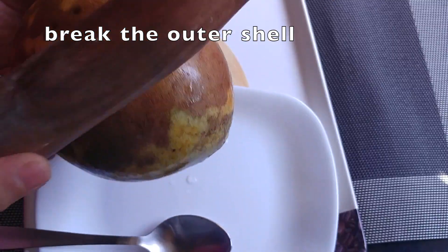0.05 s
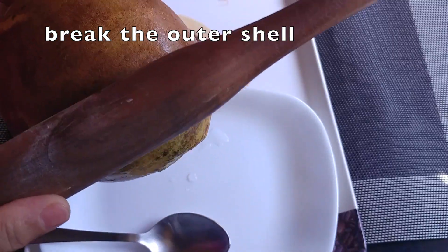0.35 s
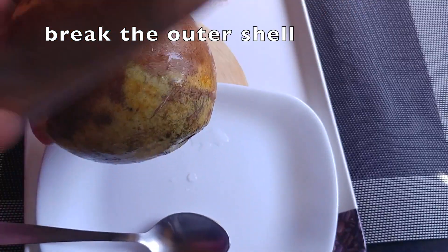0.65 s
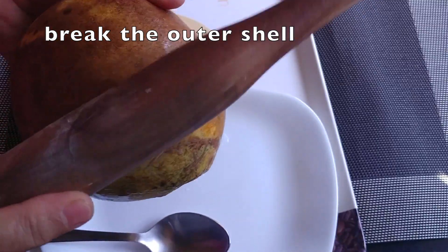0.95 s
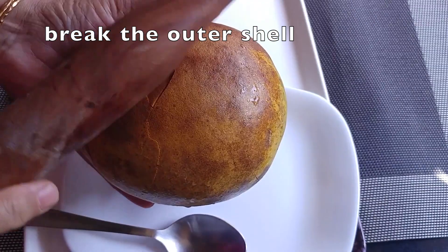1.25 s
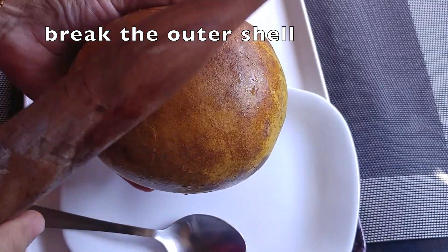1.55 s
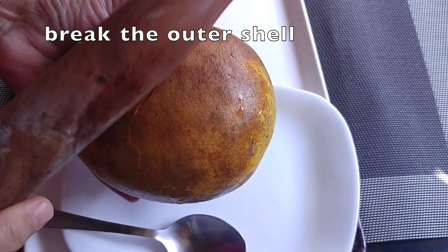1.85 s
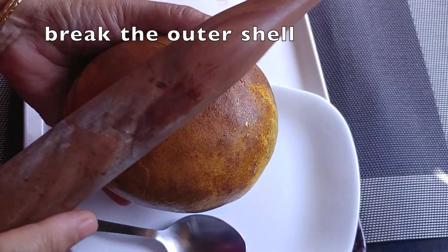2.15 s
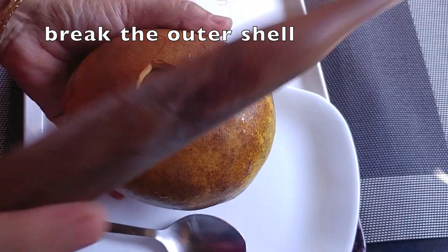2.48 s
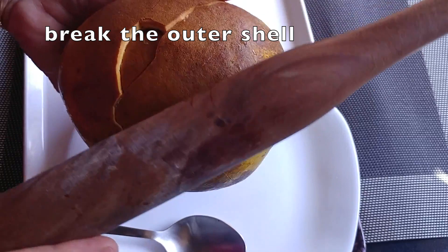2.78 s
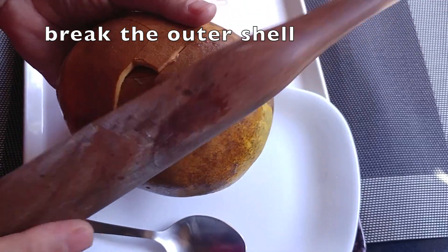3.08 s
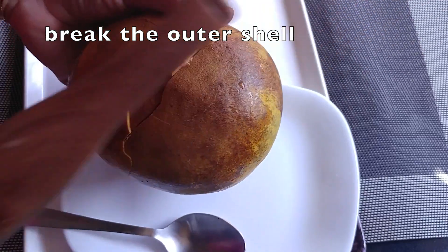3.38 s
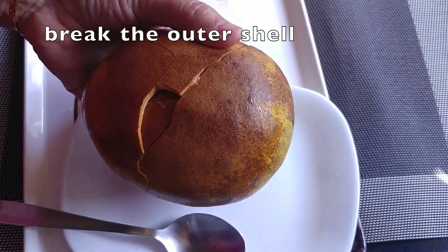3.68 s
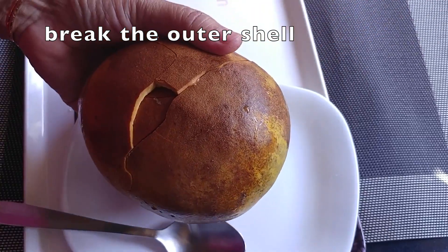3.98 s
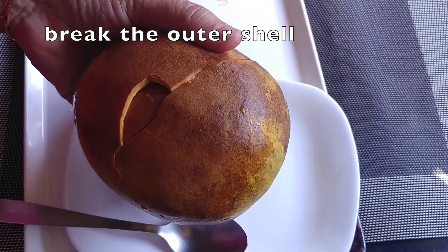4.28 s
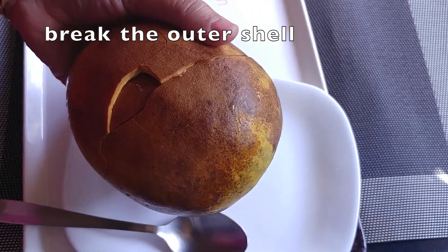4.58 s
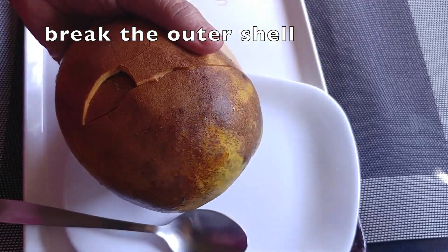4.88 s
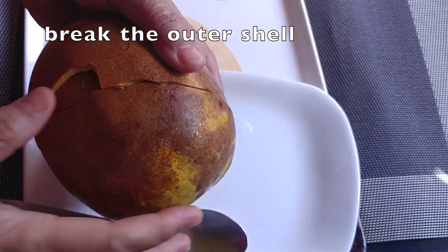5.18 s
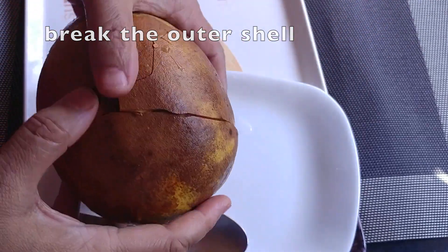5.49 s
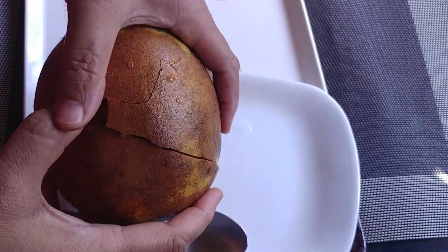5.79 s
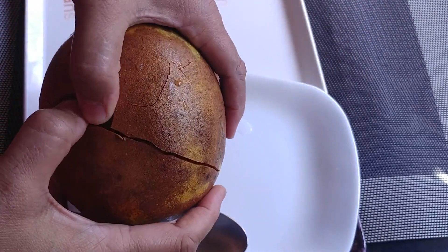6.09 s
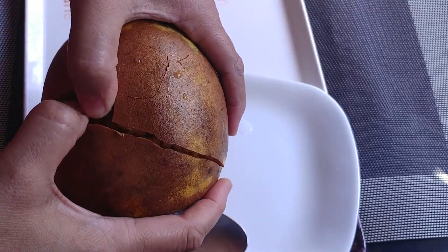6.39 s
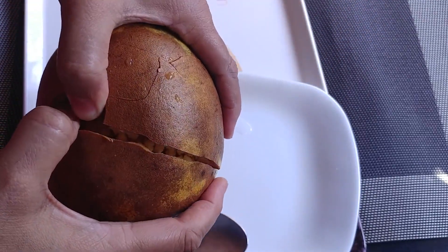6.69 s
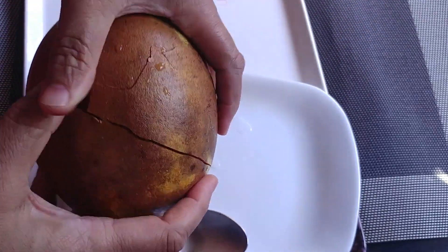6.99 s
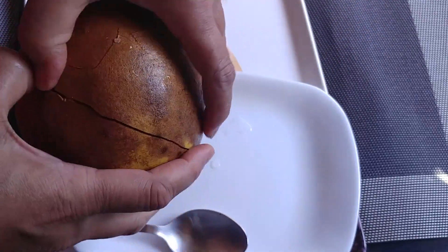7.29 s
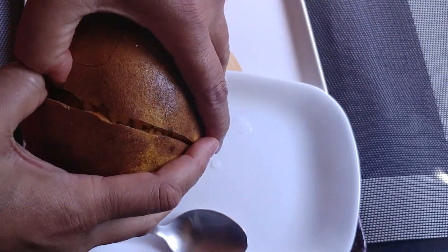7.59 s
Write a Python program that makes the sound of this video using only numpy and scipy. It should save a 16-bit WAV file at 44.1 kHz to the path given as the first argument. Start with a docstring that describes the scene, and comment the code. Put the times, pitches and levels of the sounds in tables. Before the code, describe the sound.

Sharp wooden knocks land on a hard fruit shell, each jolting a china plate and a steel spoon close by. The blows grow heavier and uneven until the shell cracks with a bright clatter. Once they stop, a distant bird whistles a run of chirps outdoors while the fruit turns over on the clinking plate and fingers brush its dry skin. The room is small, with a short echo and a faint hum.

```python
"""A wooden handle knocks on a hard-shelled fruit held on a china plate, close to the microphone.
The heavy blows crack the shell, shake the table and set the plate and a steel spoon chattering;
hands rub the shell, then the fruit rolls over and the plate clinks. The room is small, with a short
echo, a low rumble and a faint hum. Well off microphone, outside, a bird whistles a run of chirps,
and a thin rasp comes from farther away."""
import sys
import numpy as np
from scipy import signal
from scipy.fft import rfft, irfft, next_fast_len
from scipy.io import wavfile

SR = 44100
rng = np.random.default_rng(int(sys.argv[2]) if len(sys.argv) > 2 else 0)


def to_wav(s):
    """Save 16-bit WAV."""
    ch = np.atleast_2d(s).T  # columns
    pcm = np.round(np.clip(ch, -1, 1) * 32767)  # PCM
    wavfile.write(sys.argv[1], SR, pcm.astype(np.int16))


N = 337365

# Levels in the tables are relative, within each source.
# blows on the shell: (time [s], thud [dB], contact hardness as a cutoff [Hz], crack [dB])
SHELL_BLOWS = [(0.2601, -32, 1800, -28), (0.757, -37, 2990, -29), (1.2418, -34.5, 3040, -24.5),
               (1.333, -23, 755, -23), (1.5428, -21.5, 1940, -38), (1.7712, -22, 510, -36),
               (1.8046, -33, 514, -52), (2.5782, -38, 1200, -18.5), (2.5874, -26.5, 400, -30.5),
               (2.616, -25.5, 1635, -19), (2.6290, -25.5, 2000, -17.5), (2.9746, -31.5, 1190, -32),
               (3.1796, -23.5, 2790, -19.5), (4.478, -37, 1098, -42)]
# the fruit bouncing: (time [s], thud [dB], contact hardness [Hz], crack [dB], first gap [s],
# each gap over the last [ratio], step per bounce [dB])
FRUIT_BOUNCES = [(0.3223, -39, 1500, -38.5, 0.033, 0.48, -8), (0.7842, -31.5, 1600, -25, .0178, 0.66, 1.5),
                 (4.758, -37, 500, -35.5, .024, .8, 0.5)]
# modes of the shell, damped by its pulp: (frequency [Hz], level [dB], t60 [s])
SHELL_MODES = [(228, -12, 0.044), (344, -5.5, 0.032), (525, -3, .03), (730, -5.5, 0.0098), (1074, 6, .008),
               (1600, -2, 0.016)]
# the shell's crack as heard, dull above about 10 kHz: (frequency [Hz], level [dB])
CRACK_COLOUR = [(100, -12), (400, 0.5), (9000, -0.5), (10800, -16), (16000, -10)]
# the plate jolted against its tray:
# (time [s], level [dB], chatter length [s], strongest frequency [Hz], spread [octaves], clack [dB])
PLATE_RATTLES = [(0.259, -56, 0.0024, 1300, 1.4, -7), (0.766, -43.5, 0.073, 1990, 0.62, 6),
                 (1.237, -50, 0.048, 1604, 1.5, -13), (1.331, -54, 0.0053, 2670, 0.076, -5),
                 (1.542, -51, 0.0011, 1400, 0.76, 3), (2.601, -36, 0.087, 2360, 0.69, 5),
                 (3.18, -44.5, .0015, 2160, 1.03, -1.5), (4.478, -41, 0.0032, 2970, 0.88, -4.5),
                 (4.485, -38.5, .0012, 2930, 0.094, -10), (4.694, -56, 0.009, 1300, 0.37, -6),
                 (4.759, -32.5, 0.016, 3800, 1.3, -7), (4.774, -35.5, 0.024, 1213, 1.2, -10),
                 (4.8003, -34.5, 0.0051, 3100, 1.15, -3.5), (4.8367, -41, 0.0067, 3000, 0.54, -4.5),
                 (4.854, -43.5, 0.01, 1100, 1.15, -2.5)]
# the spoon bouncing on the china:
# (time [s], level [dB], chatter length [s], strongest frequency [Hz], spread [octaves], clack [dB])
SPOON_RATTLES = [(0.065, -48.5, 0.026, 6400, 1.14, 17), (0.133, -47, .022, 7500, 1.44, 5.5),
                 (0.756, -40.5, 0.045, 8860, 0.48, 8), (0.773, -41, 0.069, 7000, .6, 8),
                 (1.244, -41, 0.042, 9280, 0.82, 16), (2.584, -37, 0.033, 6000, 1.8, 8.5),
                 (2.5983, -27.5, 0.058, 7500, 1.22, -3.5), (2.651, -35.5, .02, 8400, 0.87, 4.5),
                 (2.673, -28, 0.033, 7000, .8, -0.5), (2.700, -33, 0.0219, 4057, 0.51, -5),
                 (3.182, -56.5, .004, 8430, 0.61, 52), (3.413, -62, 0.018, 5170, 2.4, 7.5),
                 (4.272, -46, .014, 4804, 1.05, -0.5)]
# modes of the china plate: (frequency [Hz], level [dB], t60 when loose [s])
PLATE_MODES = [(355, -7, .3), (971, 0, .28), (1034, -7, .2), (1160, -12, .25), (1797, -4, .3),
               (1840, -5, .26), (2503, -13, .16), (2755, -1, .26), (2895, -4, .18), (2945, -1, .2),
               (2990, -7, .22), (3715, -11, .2), (3886, -9, .2), (4330, -9, .2), (4499, 0, .3),
               (4710, -10, .24), (4889, -7, .24), (4942, -6, .22), (6364, -10, .2), (8150, -8, .17),
               (8470, -8, .17)]
# modes of the steel spoon: (frequency [Hz], level [dB], t60 when loose [s])
SPOON_MODES = [(1151, 1, .26), (1833, -4, .2), (3040, 2, .17), (3190, -6, .2), (4063, -1, .28),
               (4447, -7, .25), (4825, -8, .22), (5247, -8, .24), (5303, -4, .24), (5430, -6, .2),
               (5985, -2, .11), (6655, -9, .24), (6711, -9, .24), (7570, -4, .15), (8303, -3, .22),
               (8400, -4, .22), (8686, -4, .22), (9260, -7, .22), (9390, -5, .18), (10060, -9, .16),
               (12614, -10, .2), (13230, -14, .18), (15200, -11, .15)]
# the dense, short-lived ring of a contact on the plate: (frequency [Hz], level [dB])
PLATE_CLACK_COLOUR = [(100, -7), (300, 7.5), (600, 3.5), (1000, 3.5), (1400, -5), (2300, -3.5),
                      (3000, -3.5), (4600, -2), (5600, -6.5), (8400, -12), (9600, -21.5), (11000, -50),
                      (16000, -47.5)]
# the same on the spoon: (frequency [Hz], level [dB])
SPOON_CLACK_COLOUR = [(100, -8.5), (400, -4), (1000, 11), (2300, -1.5), (3000, 2), (5500, 1), (7100, -7),
                      (8500, 6.5), (9800, -11.5), (10800, -22), (12500, -7), (16000, -11.5)]
# the fruit grinding over the china: (frequency [Hz], level [dB])
GRIND_COLOUR = [(60, -0.5), (300, 3), (600, -13.5), (1500, -27.5), (9000, -31.5), (11000, -50),
                (16000, -51)]
# strokes of the hands over the shell: (time [s], length [s], level [dB])
HAND_STROKES = [(0, 0.15, -68.5), (1.3, 0.55, -74), (2.046, 0.081, -70), (2.246, 1, -77.5),
                (3.749, .55, -76), (4.397, 1.33, -83.5), (6.608, 0.09, -81.5), (7.451, 0.21, -86.5)]
# skin sliding on dry shell: (frequency [Hz], level [dB])
SKIN_COLOUR = [(100, -29), (500, -7), (900, -4), (1600, 1.5), (2100, 0), (2900, -14), (5000, -18.5),
               (16000, -39)]
# a thin, high rasp far outside, like a second bird: (time [s], level [dB], frequency [Hz])
FAR_RASPS = [(1.391, -69.5, 5110), (4.05, -78.5, 5450), (5.609, -79, 5600), (7.1, -91, 5020)]
# decay of the small room's echo: (frequency [Hz], t60 [s])
ROOM_DECAY = [(100, .4), (400, 0.38), (1000, 0.3), (3000, 0.29), (8000, 0.29), (16000, 0.27)]
# room tone: (frequency [Hz], level [dB])
AIR_COLOUR = [(20, 0), (48, -1.5), (75, -11), (105, -9), (165, -23), (290, -23.5), (500, -31), (1650, -48),
              (1950, -42.5), (2350, -50.5), (6000, -56.5), (9000, -54.5), (11000, -76), (16000, -71.5)]
# how alike left and right are at the microphone: (frequency [Hz], correlation [ratio])
STEREO_LIKENESS = [(30, 0.99), (150, .96), (300, 0.96), (700, 0.16), (2000, 0.057), (16000, 0.033)]

CRACK_HZ, CRACK_REF_DB, CRACK_DB_PER_OCTAVE = 4183, -28.5, 45  # a stronger crack is brighter
FREE_CHATTER_S, GRIP_POWER = .085, 0.39  # a dish that chatters this long rings fully; a held one less
RING_STOP_S = 1.267  # the ringing stops short here and the room tone steps up
# the song: chirps come quickest, and are loudest, part way through
SONG_S, CHIRP_PERIOD_S, QUICKEST_S, SLOWING_PER_S = 3.52, .293, 4.11, .018
CHIRP_GAIN_DB, LOUDEST_S, FADE_DB_PER_S2 = -63, 4.53, 2.2
# the shape of a typical chirp
CHIRP_S, FLICK_S, ARCH_AT_S, ARCH_S, DROP_AT_S, DROP_S = 0.14, .007, .07, .024, .116, .022
FLICK_HZ, HELD_HZ, TOP_HZ, DROP_HZ = 1995, 3800, 4865, 2600


def knock(thud_db, contact_hz, crack_db, crack_s=0.00028, crumble_db=-18, crumble_s=0.0054):
    """Close up, the shell snaps, then the fruit swings; a soft contact reaches only its low modes."""
    t = clock(.1)
    late = np.maximum(t - .0003, 0)
    swing = sum(amp(db - 60 * late / t60) * np.sin(2 * np.pi * hz * late) for hz, db, t60 in SHELL_MODES)
    bass_cut = signal.butter(2, 150, "high", fs=SR, output="sos")  # a small body radiates little bass
    thud = lowpass(signal.sosfilt(bass_cut, swing), contact_hz)
    snap = np.exp(-t / crack_s) + amp(crumble_db) * np.exp(-t / crumble_s)
    crack_hz = CRACK_HZ * 2 ** ((crack_db - CRACK_REF_DB) / CRACK_DB_PER_OCTAVE)
    crack = lowpass(noise(len(t), CRACK_COLOUR) * snap, crack_hz)
    return 3 * (amp(thud_db) * unit(thud) + amp(crack_db) * unit(crack))


def shell_contacts(bounces=3):
    """Every contact of the shell: the blows, and bounces that come ever faster."""
    yield from SHELL_BLOWS
    for s, thud_db, contact_hz, crack_db, gap, shrink, step_db in FRUIT_BOUNCES:
        for k in range(bounces):
            yield s, thud_db + k * step_db, contact_hz, crack_db + k * step_db
            s += gap * shrink ** k


def chatter(modes, colour, jolt, clack_s, first_force, bounces_per_s, top_hz):
    """A first contact and quick bounces ring the plate or spoon; a grip on it shortens the ring."""
    db, length, centre_hz, spread, clack_db = jolt
    ring_share = min((length / FREE_CHATTER_S) ** GRIP_POWER, 1)
    t = clock(.5)
    chance, size = rng.random((2, len(t)))
    settling = np.exp(-np.minimum(t / length, 10) ** 4)
    force = (chance < bounces_per_s / SR) * (2 * size - 1) * settling
    force[0] = first_force

    def drive(hz):
        """How strongly this contact drives each frequency."""
        return 1 / (1 + .5 * (np.log2((hz + 1) / centre_hz) / spread) ** 2)

    ring = np.zeros((2, len(t)))
    for (hz, mode_db, t60), phase in zip(modes, rng.random((len(modes), 2, 1))):
        pole = np.exp((2j * np.pi * hz - np.log(1000) / (t60 * ring_share)) / SR)
        swing = signal.lfilter([1], [1, -pole], force) * np.exp(2j * np.pi * phase)
        ring += amp(mode_db) * drive(hz) * unit(swing.real)
    clack = signal.fftconvolve(force[None], noise(len(t), colour) * np.exp(-t / clack_s), axes=1)
    padded = 2 * len(t)
    clack = irfft(rfft(clack, padded) * drive(np.fft.rfftfreq(padded, 1 / SR)))[:, :len(t)]
    treble_cut = signal.butter(8, top_hz, fs=SR, output="sos")  # the clink falls steeply above top_hz
    return 40 * amp(db) * unit(signal.sosfilt(treble_cut, unit(ring) + amp(clack_db) * unit(clack)))


def table_top(start, end):
    """Shell, plate and spoon struck near the microphone between two times, with their echo."""
    shell, dishes = np.zeros((2, 2, N))
    for s, thud_db, contact_hz, crack_db in shell_contacts():
        if start <= s < end:
            blow = np.pad(knock(thud_db, contact_hz, crack_db), ((0, 0), (0, SR // 2)))
            add(shell, s, room(blow, near_db=-4.5, walls_db=-8.0))  # each new spot has its own echo
    for s, *jolt in PLATE_RATTLES:
        if start <= s < end:
            add(dishes, s, chatter(PLATE_MODES, PLATE_CLACK_COLOUR, jolt,
                                   clack_s=0.015, first_force=2.5, bounces_per_s=600, top_hz=8620))
    for s, *jolt in SPOON_RATTLES:
        if start <= s < end:
            add(dishes, s, chatter(SPOON_MODES, SPOON_CLACK_COLOUR, jolt,
                                   clack_s=.009, first_force=2.3, bounces_per_s=1100, top_hz=14900))
    return shell + room(dishes, near_db=-12.5, walls_db=-6.5)


def roll(start_s=4.78, db=-59):
    """The rough shell rolls over the china with a dull grinding that dies away."""
    level = amp(db) * envelope(start_s, length=0, attack_s=.03, release_s=0.43)
    return level * noise(next_fast_len(N, real=True), GRIND_COLOUR)[:, :N]


def hands(grain_db=2.5, grains_per_s=70):
    """Close by, skin slides over the dry shell in small, uneven slips."""
    t = np.arange(N) / SR
    slips = np.interp(t * grains_per_s, np.arange(2000), rng.standard_normal(2000))
    strokes = sum(amp(db) * envelope(s, length, attack_s=0.034, release_s=.07)
                  for s, length, db in HAND_STROKES)
    return strokes * amp(grain_db * slips) * noise(next_fast_len(N, real=True), SKIN_COLOUR)[:, :N]


def table_shake(gain_db=23, decay_s=0.17):
    """The level of the table's rumble: each thud shakes it, and the shaking dies away."""
    energy = np.zeros(N)
    for s, thud_db, *_ in shell_contacts():
        energy[round(s * SR)] += amp(gain_db + thud_db) ** 2
    return np.sqrt(signal.lfilter([1], [1, -np.exp(-2 / (decay_s * SR))], energy))


def room(x, near_db, walls_db, near_s=0.0087):
    """The table's reflections reach the microphone within milliseconds, the walls' after them."""
    t = clock(1)
    near = unit(noise(SR) * (t > .003) * np.exp(-t / near_s))
    walls = unit(echo_tail(ROOM_DECAY) * np.clip(t / 0.007 - .5, 0, 1))
    response = amp(near_db) * near + amp(walls_db) * walls
    return x + signal.fftconvolve(x, response, axes=1)[:, :x.shape[1]]


def echo_tail(t60s):
    """A diffuse echo in which each band dies at its own speed."""
    hz, t, bands = signal.stft(noise(SR), SR, nperseg=256)
    decay = amp(-60 * t / curve_at(t60s, hz)[:, None])
    return signal.istft(bands * decay, SR, nperseg=256)[1][:, :SR]


def chirp(waver=.022, rise_s=.02, fade_s=.035, pace_spread=.04, top_db=-3):
    """One whistle: a flick up to a held note, a softer arch above it and a drop, never twice alike."""
    t = clock(CHIRP_S) * (1 + pace_spread * rng.standard_normal())
    flick = np.exp(-t / FLICK_S)
    arch = np.exp(-((t - ARCH_AT_S) / ARCH_S) ** 2)
    drop = (1 + np.tanh((t - DROP_AT_S) / DROP_S)) / 2
    hz = HELD_HZ + (FLICK_HZ - HELD_HZ) * flick + (TOP_HZ - HELD_HZ) * arch + (DROP_HZ - HELD_HZ) * drop
    wobble = np.interp(t, np.linspace(0, CHIRP_S, 40), rng.standard_normal(40))
    level = np.clip(np.minimum(t / rise_s, (t[-1] - t) / fade_s), 0, 1) * amp(top_db * arch)
    return level * np.sin(2 * np.pi * np.cumsum(hz * (1 + waver * wobble)) / SR)


def birds(direct_db=-10, rasp_s=0.15, rasp_width_hz=750, chirps=9):
    """Distant chirps that swell, slow and fade, and a few rasps, arriving mostly as echo off the yard."""
    s, song = SONG_S, np.zeros((2, N))
    for _ in range(chirps):
        add(song, s, amp(CHIRP_GAIN_DB - FADE_DB_PER_S2 * (s - LOUDEST_S) ** 2) * chirp())
        s += CHIRP_PERIOD_S + SLOWING_PER_S * (s - QUICKEST_S) ** 2
    t = clock(rasp_s)
    for s, db, hz in FAR_RASPS:
        flutter = lowpass(lowpass(rng.standard_normal(len(t)), rasp_width_hz), rasp_width_hz)
        add(song, s, amp(db) * flutter / flutter.std() * np.hanning(len(t)) * np.sin(2 * np.pi * hz * t))
    yard = unit(echo_tail([(2000, 0.53), (5000, 0.53)]))
    return amp(direct_db) * song + 1.89 * signal.fftconvolve(song, yard, axes=1)[:, :N]


def room_tone(air_gain_db=-55, split_hz=140, rumble_db=-1.5, hum_hz=92.9, hum_db=-70.5):
    """The room behind it all: rumble that swells as blows shake the table, thin hiss and a low hum."""
    t = np.arange(N) / SR
    early = t < RING_STOP_S  # rumble and hiss start out quieter
    size = next_fast_len(N, real=True)
    air = amp(air_gain_db) * noise(size, AIR_COLOUR)
    bass = irfft(rfft(air) / (1 + (np.fft.rfftfreq(size, 1 / SR) / split_hz) ** 4), size)
    rumble = bass[:, :N] * np.hypot(amp(rumble_db - 9.5 * early), table_shake())
    hiss = (air - bass)[:, :N] * amp(-6.5 * early)
    hum = np.sqrt(2) * amp(hum_db) * np.sin(2 * np.pi * hum_hz * t)
    return rumble + hiss + hum


def noise(size, colour=None):
    """Stereo noise of rms 1, alike in the bass and unrelated in the treble."""
    hz = np.fft.rfftfreq(size, 1 / SR)
    a, b = rfft(rng.standard_normal((2, size)))
    likeness = np.clip(curve_at(STEREO_LIKENESS, hz), -1, 1)
    mid, side = a * np.sqrt(1 + likeness), b * np.sqrt(1 - likeness)
    gain = 1 if colour is None else amp(curve_at(colour, hz))
    return unit(irfft(np.array([mid + side, mid - side]) * gain, size)) * np.sqrt(size)


def envelope(s, length, attack_s, release_s):
    """Rises at time s, holds for its length, then dies away."""
    t = np.arange(N) / SR - s
    return np.clip(t / attack_s, 0, 1) * np.exp(-np.maximum(t - length, 0) / release_s)


def lowpass(x, hz):
    """A gentle, causal treble roll-off."""
    return signal.sosfilt(signal.butter(2, min(hz, SR / 2 - 1), fs=SR, output="sos"), x)


def amp(db):
    """Decibels to gain."""
    return 10 ** (np.asarray(db) / 20)


def unit(x):
    """Scales to a mean energy of 1 per channel."""
    return x / np.sqrt(np.mean(np.sum(abs(x) ** 2, -1)) + 1e-20)


def curve_at(points, hz):
    """Reads a curve on a log-frequency axis."""
    f, value = np.transpose(points)
    return np.interp(np.log(hz + 1), np.log(f + 1), value)


def add(mix, s, sound):
    """Adds a sound to both channels from time s on."""
    part = mix[:, round(s * SR):][:, :sound.shape[-1]]
    part += sound[..., :part.shape[1]]


def clock(seconds):
    """Sample times of a short sound."""
    return np.arange(int(seconds * SR)) / SR


def scene():
    """Two runs of blows up close, the first one's ring stopping short; birds and room tone behind."""
    ring_gate = np.clip((RING_STOP_S - np.arange(N) / SR) / 0.0011, 0, 1)
    struck = table_top(0, RING_STOP_S) * ring_gate + table_top(RING_STOP_S, N / SR)
    return struck + hands() + roll() + birds() + room_tone()


def record(dry, ceiling=0.15, edge_hz=15900):
    """The recorder rounds off the highest peaks and limits the band."""
    rounded = ceiling * np.tanh(dry / ceiling)
    band_limit = signal.firwin(511, edge_hz, window=("kaiser", 9), fs=SR)
    return signal.oaconvolve(rounded, band_limit[None], "same")


dry = scene()
out = record(dry)
to_wav(out)
```